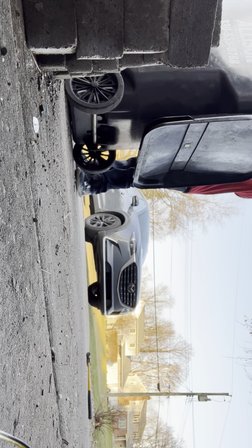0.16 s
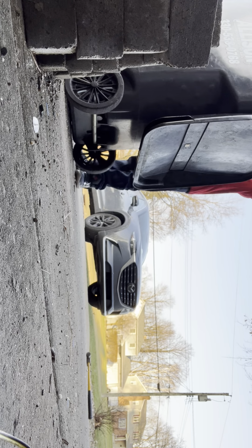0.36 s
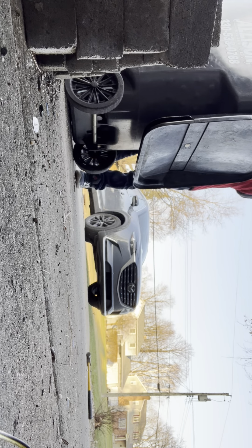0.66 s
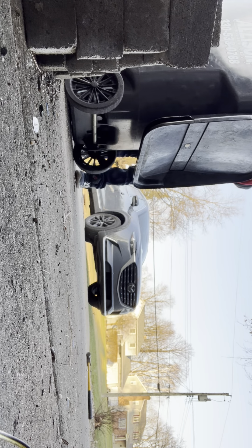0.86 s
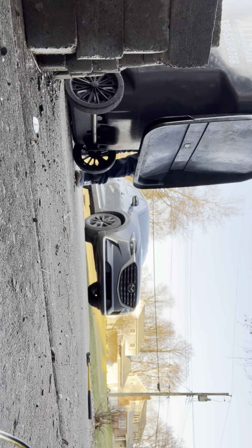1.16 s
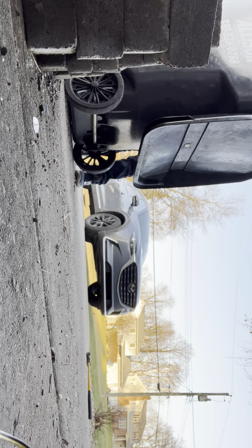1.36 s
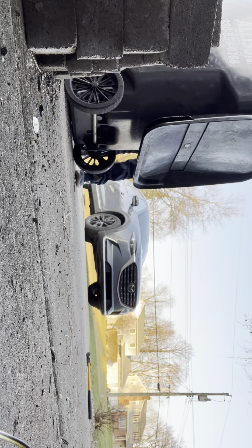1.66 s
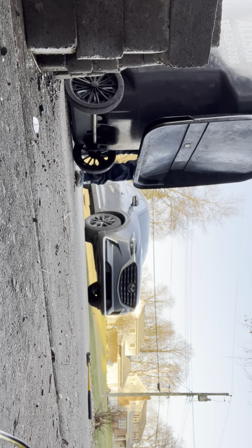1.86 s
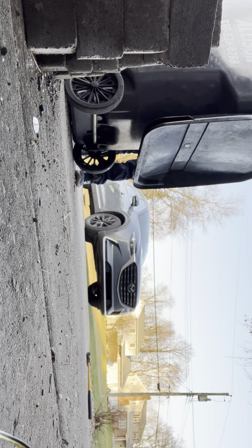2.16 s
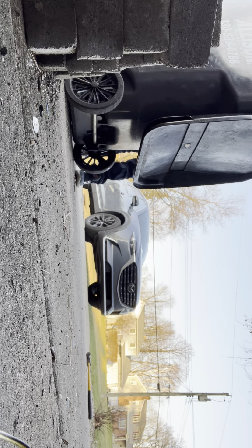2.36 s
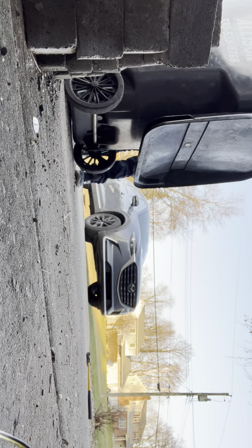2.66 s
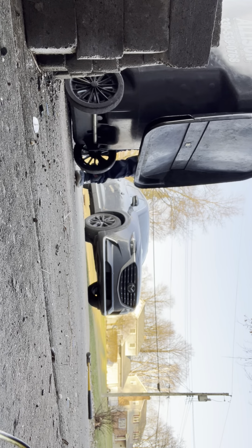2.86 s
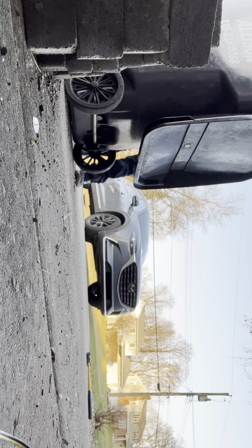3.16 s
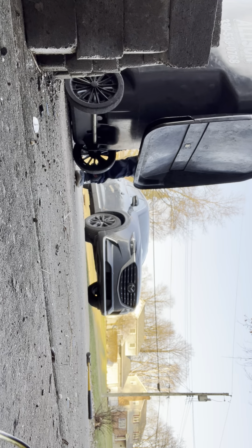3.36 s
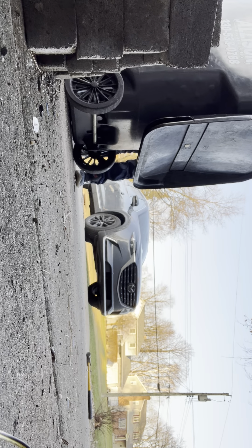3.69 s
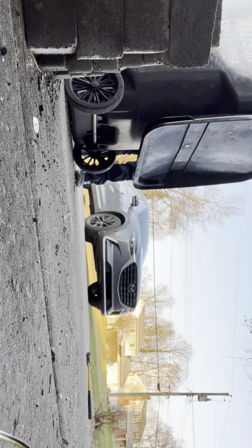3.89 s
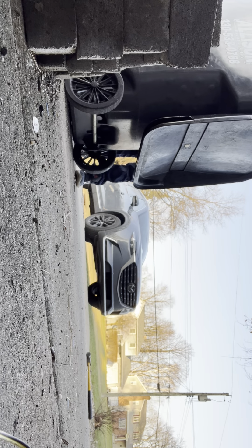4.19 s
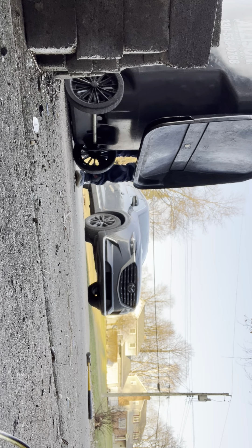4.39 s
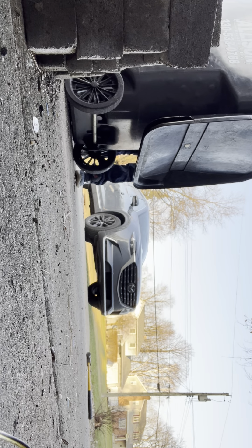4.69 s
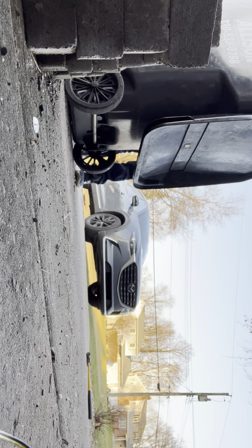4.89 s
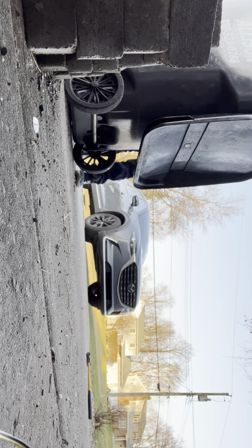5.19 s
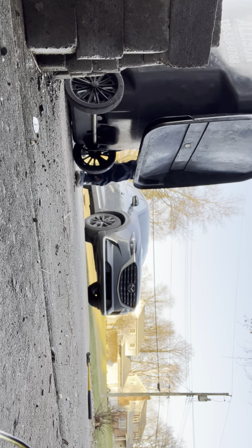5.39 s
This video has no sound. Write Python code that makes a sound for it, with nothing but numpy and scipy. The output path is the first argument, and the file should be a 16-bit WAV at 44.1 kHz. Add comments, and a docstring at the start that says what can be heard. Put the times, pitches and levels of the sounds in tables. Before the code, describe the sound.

A low, wavering outdoor rumble with faint hiss and a very thin steady ring opens the scene. At about 0.16 s an old television takes a hard double blow on a driveway: a hollow boom, knock and crack, with clacking pieces at 0.35 and 0.47 s. Sparse glassy ticks follow until 1.2 s. Knocks at 1.34 and 1.43 s, the latter with a sharp snap, lead into a second crash at 1.5 s, full of splinters, sliding wreckage and a short steel ring. A piece knocks at 1.8 s. A dull, low thud lands at 2.35 s. A knock at 2.99 s starts the third crash, thickest from 3.04 to 3.6 s, with heavy blows, tumbling fragments and closing clacks. Then faint settling, and from 4.57 s a weak shuffle with knocks near 4.75 and 4.92 s, fading by 5.5 s. Nearby walls scatter the sound briefly; the phone's stereo pickup favours one side.

```python
"""First a low outdoor rumble and a thin hanging ring, then an old television is smashed on a driveway beside
wheeled bins: two heavy crashes, a dull thud, a third crash, and a shuffle of knocks.
Each blow, slide and landing piece is a run of small contacts that booms, knocks, clacks and cracks in the
cabinet; pieces tumble, splinters click, a steel part rings on and shards tick.
Nearby walls scatter it all, and it reaches the two microphone ports of a phone from one side."""
import sys
import numpy as np
from scipy import signal
from scipy.fft import rfft, irfft, next_fast_len
from scipy.io import wavfile
from scipy.ndimage import uniform_filter1d

SR = 44100
rng = np.random.default_rng(int(sys.argv[2]) if len(sys.argv) > 2 else 0)


def materialize(psi):
    """Save the field psi as 16-bit PCM at rate SR to the path in sys.argv[1].

    A 1-D psi becomes a single channel; in a 2-D psi each row is a channel.
    """
    bounded = np.clip(np.atleast_2d(psi).T, -1, 1)
    quanta = np.round(bounded * 32767).astype(np.int16)
    wavfile.write(sys.argv[1], SR, quanta)


N = 244314
LENGTH = 36864  # samples in one burst or wall tail
AGE = np.arange(LENGTH) / SR  # s since a burst began
TOP_HZ = 16000  # upper limit of the phone


def undb(db):
    """Decibels to gain."""
    return 10 ** (np.asarray(db) / 20)


def unit(x):
    """Scale to rms 1."""
    return x / np.sqrt(np.mean(x ** 2))


def fade(t60, t=AGE):
    """Exponential decay, 60 dB in t60 seconds (5 ms at least)."""
    return np.exp(-np.log(1000) * t / max(t60, .005))


def build_up(time, t=AGE):
    """Exponential approach to full level, with this time constant in seconds."""
    return 1 - np.exp(-t / time)


def bins(size):
    """Frequencies in Hz of a spectrum of this many samples, kept off zero."""
    return np.maximum(np.fft.rfftfreq(size, 1 / SR), 1)


def colour(points, hz):
    """Gain of (f/Hz, level/dB) points joined on a log axis."""
    f, db = np.transpose(points)
    return undb(np.interp(np.log(hz), np.log(f), db))


def causal(gain):
    """Minimum-phase response with this gain: nothing sounds before the blow."""
    cepstrum = irfft(np.log(gain + 1e-7))
    half = len(cepstrum) // 2
    cepstrum[1:half] *= 2
    cepstrum[half + 1:] = 0
    return np.exp(rfft(cepstrum))


def band(hz, lo, hi, order=10):
    """Gain of a steep band-pass."""
    low_cut = 1 + (lo / hz) ** order
    high_cut = 1 + (hz / hi) ** order
    return 1 / np.sqrt(low_cut * high_cut)


def add(out, s, x):
    """Mix x into out from time s."""
    i = max(int(s * SR), 0)
    out[i:i + len(x)] += x[:len(out) - i]


def wander(rate):
    """Random levels held 1 / rate s and slewed; spread near 1."""
    k = int(SR / rate)
    return uniform_filter1d(np.repeat(rng.standard_normal(N // k + 1), k), k)[:N]


def burst(envelope, response, spread_db, size=90):
    """Dense contacts of uneven size under an envelope, rung through a body; keeps the envelope's energy."""
    steps_db = spread_db * rng.standard_normal(LENGTH // size + 1)
    sizes = np.repeat(undb(steps_db), size)[:LENGTH]
    grains = envelope * sizes * rng.standard_normal(LENGTH)
    rung = irfft(rfft(grains) * response)
    return unit(rung) * np.sqrt(np.mean(envelope ** 2))


def note(hz, t60, push_cycles=3):
    """One damped mode of a loose piece, building up over its first cycles."""
    t = AGE[:int(t60 * SR)]
    return np.sin(2 * np.pi * hz * t) * fade(t60, t) * build_up(push_cycles / hz, t)


# Heavy blows; weight feeds the boom, hardness the crack: (t/s, level/dB, weight/dB, hardness/dB)
BLOWS = [(0.164, -9, -4, 0), (0.189, -12.5, 2, -7), (0.271, -28.5, 3, 6.5), (0.386, -29.5, -4, -0.5),
         (1.503, -8.5, -9, -1.5), (1.535, -15.5, -14, -0.5), (1.597, -24.5, -2, 17.5),
         (1.694, -31, 0, 15.5), (1.786, -31, 4, 4.5), (1.844, -33.5, 2, 0.5), (2.349, -25.5, 8, -12.5),
         (2.618, -39.5, 5, 9.5), (3.042, -16, -5, -1), (3.098, -16.5, -4, 5), (3.144, -9, 4, -4.5),
         (3.228, -18.5, -8.5, 1), (3.264, -21, 10, -13), (3.343, -14, -8, -21.5), (3.444, -37, 11, 2.5),
         (3.484, -33, 1, -4.5), (3.54, -38, 5, -13), (4.654, -39.5, 10.5, 3), (4.816, -38.5, 9, -1),
         (4.916, -25, -11, -2.5), (4.985, -36, 9, 6.5), (5.048, -32.5, 5, -3)]
BLOW_RISE_S, BLOW_T60_S = 0.00066, 0.23  # before each voice adds its rise and stretches the decay


def blow_contacts():
    """A blow drives the cabinet at once and dies away, with no hold or lurching."""
    return [(s, db, weight, hard, BLOW_RISE_S, 0, BLOW_T60_S, 1) for s, db, weight, hard in BLOWS]


# Wreckage collapsing or being shoved: (t/s, level/dB, swell/s, hold/s, weight/dB, hardness/dB)
SLIDES = [(0.02, -57, 0.0042, 0.011, -5, 22.5), (0.208, -41, .03, .13, -8, 2),
          (1.498, -20.5, 0.022, 0.099, -1, 2.5), (2.284, -33.5, 0.073, .005, 2.5, -2),
          (2.585, -39, 0.019, 0.075, 6.5, -10), (3.041, -20, 0.058, 0.2, 4.5, -1.5),
          (3.84, -49.5, 0.016, 0.036, -3, 4.5), (4.097, -53.5, .03, .08, 7, -1),
          (4.572, -43.5, 0.023, 0.11, 7.5, -0.5), (4.892, -40.5, 0.0081, 0.15, -0.5, 5.5)]
SLIDE_T60_S, SLIDE_REF_DB, SLIDE_DOUBLING_DB = .55, -20, 32  # bigger collapses take longer to settle
SLIDE_LURCH_DB, LURCHES_PER_S = 3.5, 45.2


def settling(db):
    """Time in seconds that a slide of this level takes to die away, before each voice stretches it."""
    return SLIDE_T60_S * 2 ** ((db - SLIDE_REF_DB) / SLIDE_DOUBLING_DB)


def slide_contacts():
    """A slide swells, holds and dies away, its level lurching as the wreckage catches and slips."""
    events = []
    for s, db, swell, hold, weight, hard in SLIDES:
        lurch = unit(undb(SLIDE_LURCH_DB * wander(LURCHES_PER_S)[:LENGTH]))
        events.append((s, db, weight, hard, swell / 2, swell + hold, settling(db), lurch))
    return events


# Loose pieces landing: (t/s, level/dB, hardness/dB, t60 of the contact/s, low note f/Hz, high note f/Hz)
KNOCKS = [(0.347, -18.5, 6, 0.075, 754, 1600), (0.472, -26.5, 4, 0.23, 706, 1394),
          (1.336, -22, 3.5, 0.079, 776, 1465), (1.431, -20, 9, 0.02, 1405, 1680),
          (1.788, -22, -4, 0.057, 746, 1383), (2.072, -40.5, 8, 0.15, 898, 1446),
          (2.987, -22, -15, 0.26, 675, 1640), (3.542, -29.5, -11, 0.065, 760, 1705),
          (3.568, -27, 3.5, 0.043, 1143, 1174), (3.602, -19, 3.5, 0.036, 985, 1500),
          (4.146, -41, 3, 0.071, 990, 1340), (4.75, -28, 3.5, 0.18, 1170, 1443)]
KNOCK_RISE_S, KNOCK_BODY_DB, KNOCK_WEIGHT_DB = .001, -9, -1  # how a landing piece drives the cabinet


def knock_contacts():
    """A landing piece drives the cabinet briefly, more weakly than a blow of the same level."""
    return [(s, db + KNOCK_BODY_DB, KNOCK_WEIGHT_DB, hard, KNOCK_RISE_S, 0, t60, 1)
            for s, db, hard, t60, _, _ in KNOCKS]


# Boom, knock, clack and crack of the cabinet: (low edge f/Hz, high edge f/Hz, trim level/dB,
# response to weight, response to hardness, added rise/s, decay as a multiple of the contact's,
# debris tail level/dB, spread of contact sizes/dB)
VOICES = [(30.4, 234, -2, 0.87, 0.013, 0.0054, 1.96, -32, 4),
          (179.6, 804, -0.5, 0, 0, 0.0015, 0.92, -22, 2),
          (663, 2040, -4, 0.022, 0.53, 0.00032, 0.82, -17, 3),
          (2620, 23000, -11.5, 0, 1, 0.00078, .93, -21.5, 2)]
# Broad colour of the cabinet: (f/Hz, level/dB)
CABINET = [(30, -29), (52, -3), (85, -1.5), (125, -4.5), (240, -4), (440, -6), (515, -11), (640, -9),
           (950, -16), (1500, -11), (2000, -22), (2600, -23.5), (7000, -46.5), (14500, -52.5)]
# Peaks and dips of its panels: (f/Hz, width/Hz, level over the colour/dB)
PANELS = [(93.8, 36, 10), (160.5, 30, 5), (285.2, 4.7, -4), (400, 10, 1.5), (398.5, 15, 4.5),
          (579, 13, -0.5), (844, 120, 0.5), (1150, 7.7, 5.5), (1192, 44, 4.5), (1287, 15, 8.5),
          (1420, 28, -0.5), (1660, 6.4, 6.5), (1680, 22, 4.5), (1827, 29, 8.5), (2019, 260, 9.5),
          (2422, 33, 6), (2810, 17, -2), (3080, 100, 1)]


def cabinet(debris_t60=1.0):
    """Every contact drives four voices; the boom swells late, and debris rattles on after the burst."""
    out, hz = np.zeros(N), bins(LENGTH)
    events = blow_contacts() + slide_contacts() + knock_contacts()
    panels_db = sum(db / (1 + (2 * (hz - f) / width) ** 2) for f, width, db in PANELS)
    body = colour(CABINET, hz) * undb(panels_db)
    for lo, hi, trim_db, by_weight, by_hardness, late, stretch, tail_db, spread_db in VOICES:
        response = causal(body * band(hz, lo, hi))
        for s, db, weight, hardness, rise, hold, t60, lurch in events:
            released = np.maximum(AGE - hold, 0)
            decay = fade(t60 * stretch, released) + undb(tail_db) * fade(debris_t60, released)
            envelope = build_up(rise + late) * decay * lurch
            gain = undb(db + trim_db + by_weight * weight + by_hardness * hardness)
            add(out, s, gain * burst(envelope, response, spread_db))
    return out


# The whole case meeting the ground or giving way: (t/s, f/Hz, level/dB, t60/s)
THUMPS = [(0.183, 76.6, -26.5, 0.58), (1.6, 151.6, -17, 0.51), (2.368, 95.24, -18, 0.5),
          (3.147, 199, -6.5, 0.16), (3.3446, 329, 6, 0.03), (3.72, 67.7, -25.5, 0.22)]


def thumps(push=0.0033):
    """One strongly damped mode of the hollow case for each thump, pushed over a few milliseconds."""
    out = np.zeros(N)
    for s, hz, db, t60 in THUMPS:
        mode = np.sin(2 * np.pi * hz * AGE)
        add(out, s, undb(db) * build_up(push) * fade(t60) * mode)
    return out


def pieces(low_db=-8, high_db=-6, ring_t60=0.063):
    """Each loose piece rings briefly with its two notes as it lands."""
    out = np.zeros(N)
    for s, db, *_, low_hz, high_hz in KNOCKS:
        low = undb(db + low_db) * note(low_hz, ring_t60)
        high = undb(db + high_db) * note(high_hz, ring_t60)
        add(out, s, low + high)
    return out


def tumbling(trim_db=-6, spread_db=3, lo_hz=550, hi_hz=2200, cycles=130, share=.4, count=14):
    """Fragments tumble in each slide and ring at their own pitch, weaker as the wreckage settles."""
    out = np.zeros(N)
    for s, db, swell, hold, _, _ in SLIDES:
        t60 = settling(db)
        for when, place, size in zip(rng.random(count), rng.random(count), rng.standard_normal(count)):
            wait = when * (hold + share * t60)
            hz = lo_hz * (hi_hz / lo_hz) ** place
            gain = undb(db + trim_db + spread_db * size) * np.sqrt(lo_hz / hz)
            gain *= fade(t60, max(wait - hold, 0))
            add(out, s + swell + wait, gain * note(hz, cycles / hz))
    return out


def splinters(trim_db=-20, spread_db=4, flight=0.055, lo_hz=1800, hi_hz=7000, cycles=90, count=14):
    """Every heavy blow throws splinters that click at their own pitch; later ones tend to be weaker."""
    out = np.zeros(N)
    for s, db, _, hardness in BLOWS:
        waits = rng.exponential(size=count)  # in units of the mean flight
        for wait, place, size in zip(waits, rng.random(count), rng.standard_normal(count)):
            hz = lo_hz * (hi_hz / lo_hz) ** place
            gain = undb(db + hardness + trim_db + spread_db * size)
            gain *= np.exp(-wait) * np.sqrt(lo_hz / hz)
            add(out, s + flight * wait, gain * note(hz, cycles / hz))
    return out


# Small ticks of shards and grit: (t/s, level/dB)
SHARDS = [(0.024, -60), (0.167, -29.5), (0.3157, -34), (0.3325, -52), (0.6237, -48), (0.6765, -47),
          (0.8298, -42), (0.96, -50), (1.037, -50), (1.0666, -52.5), (1.1512, -46.5), (1.6041, -26.5),
          (3.111, -32.5), (3.151, -32), (4.818, -52)]
# Colour of a shard: (f/Hz, level/dB)
SHARD_COLOUR = [(1000, -0.5), (3000, -4), (6000, -8.5), (10000, -19), (13500, -4), (16000, -4.5)]
# One sharp snap just before the second crash: (t/s, level/dB, t60/s)
SNAP = (1.432, -26.5, .02)
SHARD_T60_S = 0.3


def shards(rise=0.0006):
    """A short bright sizzle of fine contacts for each shard, and the abrupt snap."""
    out, response = np.zeros(N), causal(colour(SHARD_COLOUR, bins(LENGTH)))
    for s, db in SHARDS:
        envelope = fade(SHARD_T60_S) * build_up(rise)
        add(out, s, undb(db) * burst(envelope, response, spread_db=1.5))
    s, db, t60 = SNAP
    add(out, s, undb(db) * burst(fade(t60), response, spread_db=5.0))
    return out


# Free modes of the steel part: (f/Hz, level/dB, t60/s)
STEEL = [(371.5, 0, .8), (377, -1, 1.7), (395, -3, .45), (614, -8, .5), (720, -10, .5), (877, -10, .55),
         (1109, -11, .9), (1141, -10, .55), (1346, -8, .5), (1605, -9, .55), (1626, -5, 1.15),
         (1910, -15, .85), (2500, -21, .5)]
# Blows that reach it: (t/s, level/dB, ring length as a share of the free modes')
STEEL_HITS = [(0.166, -40, .6), (1.515, -24, .33), (1.6, -28, .33), (2.325, -39, .4), (2.355, -37, .75),
              (2.625, -47, .7), (3.095, -29, .4), (3.148, -29, .4), (4.92, -41, .5), (5.05, -40, 1.25)]


def steel(scatter_db=1):
    """The same modes ring at each hit, in slightly varied balance; debris lying on the part damps it."""
    out, t = np.zeros(N), np.arange(2 * SR) / SR
    for s, hit_db, freedom in STEEL_HITS:
        for hz, db, t60 in STEEL:
            level_db = hit_db + db + scatter_db * rng.standard_normal()
            size = undb(level_db) * rng.choice([-1, 1])
            ring_t60 = t60 * freedom
            age = t[:int(ring_t60 * SR) + 1]
            add(out, s, size * fade(ring_t60, age) * np.sin(2 * np.pi * hz * age))
    return out


# A thin ring that hangs in the air until the first crash: (f/Hz, rms level at the source/dB)
HANGING = [(371.4, -57), (651.4, -51), (1109, -66)]


def hanging_ring(damped_t60=.4):
    """Thin steady tones, damped from the first crash on."""
    t = np.arange(N) / SR
    tones = sum(undb(db) * np.sqrt(2) * np.sin(2 * np.pi * hz * t) for hz, db in HANGING)
    since_crash = np.maximum(t - BLOWS[0][0], 0)
    return tones * fade(damped_t60, since_crash)


# How much louder the left port hears the blows: (f/Hz, level/dB)
SHADOW = [(100, 0), (380, 1.4), (700, 2.5), (1100, 7), (1500, 6), (2380, 3), (4400, -.5), (8000, 0)]
# Share of sound scattered by the walls: (f/Hz, level/dB)
SCATTER = [(80, -38), (250, -25), (600, -9), (1500, -8), (4000, -2), (8000, -11), (14000, -14)]
PORT_LAG_MS = .152  # left port behind the right


def ports(x, walls_t60=0.14, first_echo=0.0009):
    """Direct sound reaches the right port first; the walls add a diffuse tail that differs at each port."""
    size = 2 * next_fast_len((N + LENGTH) // 2)
    hz = bins(size)
    left_delay = np.exp(-2j * np.pi * hz * PORT_LAG_MS / 1000)
    direct = np.array([left_delay, np.ones(len(hz))])
    tail = rng.standard_normal((2, LENGTH)) * fade(walls_t60) * build_up(first_echo)
    echoes = rfft(unit(tail) / np.sqrt(LENGTH), size) * causal(colour(SCATTER, hz))
    shadow = colour(SHADOW, hz) ** np.array([[.5], [-.5]])  # half the difference at each port
    return irfft(rfft(x, size) * (direct + echoes) * shadow)[:, :N]


# Spectrum of the outdoor background: (f/Hz, relative level/dB per Hz)
AIR = [(20, -17), (35, -17.5), (60, 8), (100, -5), (175, -1), (250, -13.5), (400, -20), (600, -20.5),
       (1600, -22.5), (2200, -27), (3200, -37), (6500, -41.5), (9500, -61.5), (14000, -39)]
RUMBLE_DB, HISS_DB = -43.5, -56.5
RUMBLE_WANDER_DB, WANDER_PER_S = -0.5, 4.83


def outdoors(split_hz=300, wide_hz=900):
    """Noise nearly shared by both ports in the lows and wider above: a wavering rumble, a faint steady hiss."""
    hz = bins(N)
    mid, side = rfft(rng.standard_normal((2, N)))
    width = np.minimum(hz / wide_hz, 1)
    air = colour(AIR, hz) * (mid + width * side * np.array([[1], [-1]]))
    rumble = unit(irfft(air * band(hz, 24, split_hz), N))
    hiss = unit(irfft(air * band(hz, split_hz, TOP_HZ), N))
    rumble_gain = undb(RUMBLE_DB + RUMBLE_WANDER_DB * wander(WANDER_PER_S))
    return rumble_gain * rumble + undb(HISS_DB) * hiss


def scene():
    """The smashing, heard from one side, over the outdoor background."""
    wreck = cabinet() + thumps() + pieces() + tumbling() + splinters() + shards() + steel()
    return ports(wreck + hanging_ring()) + outdoors()


# Dip of the phone's microphone ports in the treble: (f/Hz, level/dB)
PORT_DIP = [(7500, 0), (9500, -6), (10800, -11), (12500, 0)]


def record(dry, ceiling=0.79):
    """The phone colours the treble, rounds the loudest peaks and cuts the top."""
    size = 2 * next_fast_len((N + LENGTH) // 2)
    dipped = irfft(rfft(dry, size) * causal(colour(PORT_DIP, bins(size))))[:, :N]
    rounded = ceiling * np.tanh(dipped / ceiling)
    top_cut = signal.ellip(8, .2, 70, TOP_HZ, fs=SR, output="sos")
    return signal.sosfilt(top_cut, rounded)


dry = scene()
out = record(dry)
materialize(out)
```